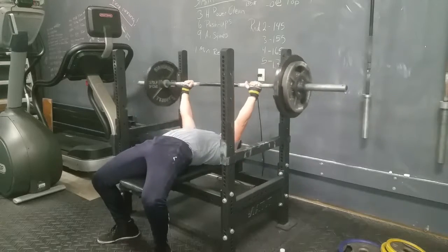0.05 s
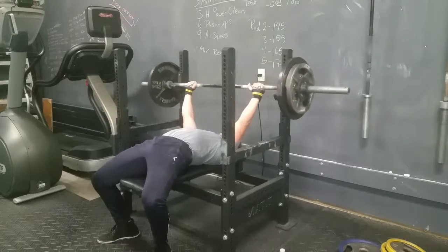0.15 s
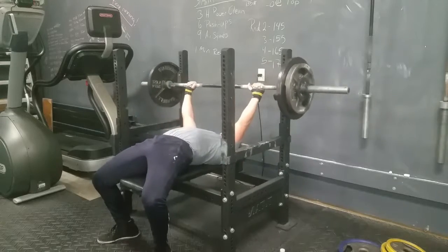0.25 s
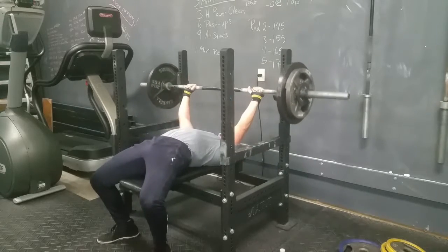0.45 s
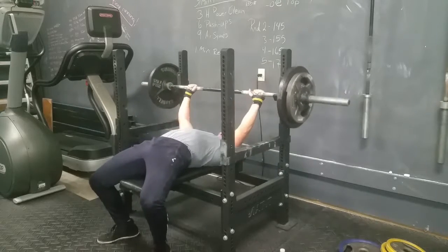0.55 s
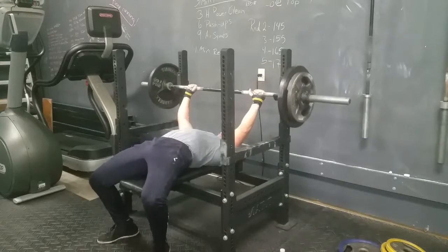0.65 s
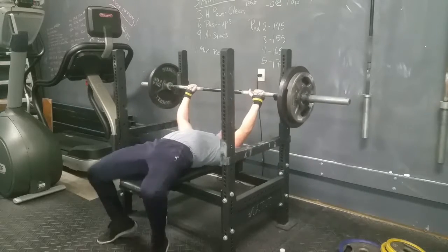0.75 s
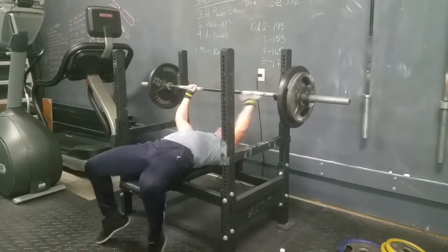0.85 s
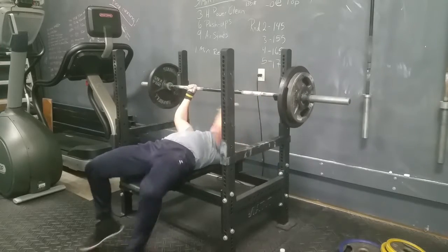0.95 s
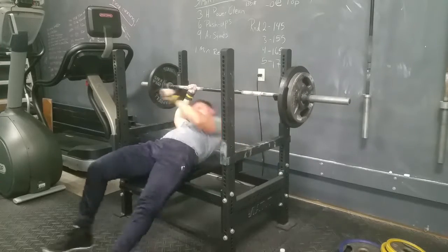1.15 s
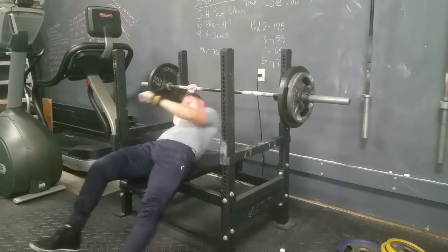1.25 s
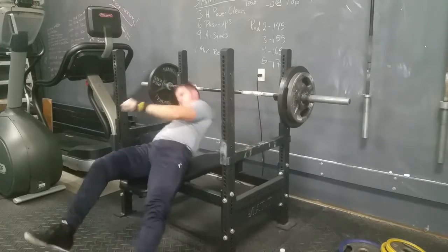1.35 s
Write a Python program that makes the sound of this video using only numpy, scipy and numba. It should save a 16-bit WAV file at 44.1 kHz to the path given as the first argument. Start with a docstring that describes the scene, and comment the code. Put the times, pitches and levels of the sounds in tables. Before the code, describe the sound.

A loaded barbell clangs into a steel rack at about 0.25 seconds, a few metres away. Quick clanks, thuds and short scrapes follow as its ends strike in turn, loudest around 0.4 and 0.7 seconds, with the iron plates ringing. From 0.9 seconds the knocks weaken, ending in a light clink near 1.3. The bar's ring lingers in the echoing gym over very faint ventilation and hum.

```python
"""A loaded barbell clatters into a steel rack, a few metres away in a hard-walled gym.
The bar hits the uprights, drops into the hooks and rocks to rest, its two ends striking in turn.
Each blow clangs the frame, rings the loose iron plates and the bar, thuds through the stand and
scrapes steel on steel. The room smears it into a long tail over ventilation and a low hum."""
import sys
import numpy as np
from scipy import signal
from scipy.fft import rfft, irfft, next_fast_len
from scipy.io import wavfile
from numba import njit

SR = 44100
rng = np.random.default_rng(int(sys.argv[2]) if len(sys.argv) > 2 else 0)


def transcribe(signal):
    """Save signal, clipped to [-1, 1], as a 16-bit WAV file at the path in sys.argv[1]."""
    frames = np.atleast_2d(signal).T
    limited = np.clip(frames, -1, 1)
    pcm = np.round(limited * 32767).astype(np.int16)
    wavfile.write(sys.argv[1], SR, pcm)


N = 61739
FFT_SIZE = 65536

# Hits of the bar, alternating ends: start_s, clang_db, plates_db, thud_db, scrape_db
BLOWS = [(0.2406, -1, -8, 3, -4.5), (.250, -0.5, 0.5, 2, -2), (.308, -6.5, -1.5, -1, -26),
         (.320, -3, -1.5, -2, -17), (.4205, 2, 6.5, -17, -1), (.431, -5, 8, -7.5, -6),
         (.465, -9.5, -11, -5, -11), (.515, -3, -4.5, -2, -16.5), (.552, -4, -17, -9.5, -27),
         (.581, -5.5, -10, -2, -10), (.601, -8, -23, -2.5, -2), (.620, -1, -9.5, -12.5, -8),
         (.638, -8, -13.5, -10.5, -14), (.667, 2, 1, 0, 4), (.674, -0.5, -9.5, 1, 5),
         (.690, -7, 1.5, -9, -3), (.728, -3, -1, -1.5, -2.5), (.752, -6.5, -18, -7, -2.5),
         (.797, -5.5, -16.5, -7.5, -15.5), (.846, -8, -18, -10, -12), (.928, -11.5, -1.5, -14, -25),
         (.975, -18.5, -12, -24, -30), (1.075, -23.5, -19.5, -18.5, -31.5), (1.262, -33, -11.5, -32, -37.5)]

def barbell():
    """The bar rocks to rest in the hooks, so its two ends strike in turn."""
    blows = np.array(BLOWS)
    return bar_end(blows[0::2]) + bar_end(blows[1::2])


def bar_end(blows):
    """One end hits its upright: five layers through the room, plus extra dry ring from the bar."""
    start_s, clang_db, plates_db, thud_db, scrape_db = blows.T
    clang = frame_clang(start_s, clang_db)
    plates = plate_ring(start_s, plates_db)
    bar = bar_ring(start_s, clang_db)
    thud = stand_thud(start_s, thud_db)
    scrape = steel_scrape(start_s, scrape_db)
    return gym(clang + plates + bar + thud + scrape) + undb(-0.5) * bar


# Tone of the frame's clang: freq_hz, level_db
FRAME_SPECTRUM = [(250, -11), (430, -14), (700, -5), (950, -0.5), (1450, -4.5), (1800, 0), (2450, -1),
                  (3100, -9.5), (3900, -9), (5000, -17), (5800, -35), (7000, -41)]

def frame_clang(start_s, hit_db, trim_db=6.5, count=400):
    """An upright's many short modes; every point of contact excites them differently."""
    edges_hz = np.linspace(FRAME_SPECTRUM[0][0], FRAME_SPECTRUM[-1][0], count + 1)
    pitch_hz = edges_hz[:-1] + np.diff(edges_hz) * rng.random(count)
    t60_s = 0.081 * np.exp(0.23 * rng.standard_normal(count))
    gains = unit(undb(lookup(FRAME_SPECTRUM, pitch_hz)))
    return strike_metal(pitch_hz, gains, t60_s, start_s, hit_db + trim_db)


# Partials of the iron plates: pitch_hz, level_db, t60_s
PLATE_MODES = [(1331, -7, 0.25), (1638.4, -3, .12), (1663, 0.5, 0.14), (1710, -4.5, 0.069),
               (1762, -13, .08), (2390, -13, 0.25), (3113, -12.5, 0.12), (3492, -12.5, 0.18),
               (3613, -13.5, 0.04)]

def plate_ring(start_s, hit_db, trim_db=-3):
    """The loose plates ring briefly in a few clear tones."""
    pitch_hz, level_db, t60_s = np.array(PLATE_MODES).T.copy()
    return strike_metal(pitch_hz, undb(level_db), t60_s, start_s, hit_db + trim_db)


# Partials of the steel bar: pitch_hz, level_db, t60_s
BAR_MODES = [(266.7, -10, .35), (728, -10.5, 0.25), (943.6, -0.5, 1.34), (1028, -7.5, 0.37),
             (1520, -3.5, 0.23), (1884, -5, 0.84), (1969, -8, .8), (2100, -7, 1.6), (2290, -7.5, 0.75),
             (2706, -15, .8), (2977, -6.5, 0.31)]

def bar_ring(start_s, hit_db, trim_db=-15.5):
    """The bar's long modes sing on after each hit."""
    pitch_hz, level_db, t60_s = np.array(BAR_MODES).T.copy()
    return strike_metal(pitch_hz, undb(level_db), t60_s, start_s, hit_db + trim_db)


def strike_metal(pitch_hz, gains, t60_s, start_s, hit_db, band_hz=(137, 5410)):
    """Each hit kicks the modes at random phases; the metal radiates little outside its band."""
    phases = np.exp(2j * np.pi * rng.random((len(start_s), len(pitch_hz))))
    pushes = phases * gains * undb(hit_db)[:, None]
    ringing = ring(pitch_hz, t60_s, (start_s * SR).astype(int), pushes)
    return signal.sosfilt(signal.butter(6, band_hz, "bandpass", fs=SR, output="sos"), ringing)


@njit
def ring(pitch_hz, t60_s, starts, pushes):
    """Damped modes; each blow gives each mode a push of its own."""
    loss = np.log(1000.) / t60_s / SR
    step = np.exp(2j * np.pi * pitch_hz / SR - loss)
    energy_scale = 2 * np.sqrt(loss)
    state = np.zeros(len(pitch_hz), np.complex128)
    out, blow = np.zeros(N), 0
    for i in range(starts[0], N):
        while blow < len(starts) and i >= starts[blow]:
            state += energy_scale * pushes[blow]
            blow += 1
        for mode in range(len(pitch_hz)):
            state[mode] *= step[mode]
            out[i] += state[mode].imag
    return out


# Low body of the thud: freq_hz, level_db
THUD_SPECTRUM = [(25, -28), (60, -25.5), (82, -11.5), (105, -6), (145, 1), (175, -1), (205, -5), (265, 2),
                 (350, -4.5), (500, -11), (900, -24.5), (4000, -83)]

def stand_thud(start_s, hit_db, trim_db=-6):
    """The weight lands with a dull thump through the stand."""
    return bursts(start_s, hit_db + trim_db, THUD_SPECTRUM, t60_s=0.064)


# Bright edge of the scrape: freq_hz, level_db
SCRAPE_SPECTRUM = [(2000, -1), (4500, 8), (6500, 2.5), (7800, -2.5), (10000, -3), (12000, -7), (15300, -17)]

def steel_scrape(start_s, hit_db, trim_db=-13):
    """Steel slides on steel with a short rasp."""
    return bursts(start_s, hit_db + trim_db, SCRAPE_SPECTRUM, t60_s=0.06)


def bursts(start_s, hit_db, spectrum, t60_s, size=8192):
    """A short dying burst of coloured noise at each blow."""
    out = np.zeros(N)
    noise = rng.standard_normal((len(start_s), size)) * fade(t60_s, size)
    shapes = unit(colour(noise, spectrum))
    for start, gain, burst in zip((start_s * SR).astype(int), undb(hit_db), shapes):
        out[start:start + size] += gain * burst[:N - start]
    return out


# Reverb time of the gym by band: freq_hz, t60_s
ROOM_DECAY = [(60, 0.85), (150, 0.96), (300, 1.36), (1000, 1.52), (2000, 1.71), (4000, 1.324), (6500, 1.2),
              (8500, 0.78), (13000, 0.62)]

def gym(x, direct_db=-13, early_db=-4, tail_db=-4.5, build_s=0.0098):
    """Direct sound, a splash off the near walls, and a long tail whose top end dies first."""
    hz = np.fft.rfftfreq(FFT_SIZE, 1 / SR)
    field = diffuse(hz)
    centres_hz, decays_s = np.array(ROOM_DECAY).T
    tail = np.zeros((2, N))
    for share, t60_s in zip(np.eye(len(centres_hz)), decays_s):
        band = lookup(np.c_[centres_hz, share], hz)
        tail += irfft(field * band)[:, :N] * fade(t60_s)
    tail *= 1 - np.exp(-np.arange(N) / SR / build_s)
    early = irfft(diffuse(hz))[:, :N] * fade(t60_s=0.14)
    response = undb(tail_db) * unit(tail) + undb(early_db) * unit(early)
    response[:, 0] += undb(direct_db)
    return signal.fftconvolve(x[None], response, axes=1)[:, :N]


def diffuse(hz, mic_gap_m=0.13):
    """Spectrum of noise from all sides at two mics: alike in the bass, unrelated in the treble."""
    coherence = np.sinc(2 * hz * mic_gap_m / 343)
    weights = np.sqrt(np.array([1 + coherence, 1 - coherence]) / 2)
    mid, side = rfft(rng.standard_normal((2, FFT_SIZE))) * weights
    return np.array([mid + side, mid - side])


# Rumble and hiss of the ventilation: freq_hz, level_db
AIR_SPECTRUM = [(25, -11), (60, -0.5), (120, -4), (170, -8.5), (400, -14), (800, -17.5), (1500, -23.5),
                (4000, -27.5), (7000, -40), (15000, -31)]

def room_tone(air_db=-60, hum_hz=115.1, hum_db=-58.5):
    """A soft bed of moving air with an electrical hum in the centre."""
    hz = np.fft.rfftfreq(FFT_SIZE, 1 / SR)
    air = irfft(diffuse(hz) * undb(lookup(AIR_SPECTRUM, hz)))[:, :N]
    hum = np.sqrt(2) * np.sin(2 * np.pi * hum_hz * np.arange(N) / SR)
    return undb(air_db) * np.sqrt(N) * unit(air) + undb(hum_db) * hum


def undb(db):
    """Decibels to gain."""
    return 10 ** (np.asarray(db) / 20)


def lookup(table, hz):
    """Read a table on a log-frequency axis."""
    table = np.array(table, float)
    return np.interp(np.log(np.maximum(hz, 1)), np.log(table[:, 0]), table[:, 1])


def colour(x, table):
    """Minimum-phase EQ from a table of freq_hz, level_db."""
    size = 2 * next_fast_len(x.shape[-1])
    gains = undb(lookup(table, np.fft.rfftfreq(size, 1 / SR)))
    cepstrum = irfft(np.log(gains))
    cepstrum[1:size // 2] *= 2
    cepstrum[size // 2 + 1:] = 0
    return irfft(rfft(x, size) * np.exp(rfft(cepstrum)))[..., :x.shape[-1]]


def fade(t60_s, size=N):
    """Exponential decay, 60 dB in t60_s."""
    return np.exp(-np.log(1000) * np.arange(size) / SR / t60_s)


def unit(x):
    """Scale to an energy of one."""
    return x / np.sqrt(np.sum(x ** 2, axis=-1, keepdims=True))


def scene():
    """The barbell up front, the room tone far beneath it."""
    return undb(10.5) * barbell() + room_tone()


# EQ of the left mic against the right: freq_hz, gain_db
LEFT_MIC_EQ = [(200, -1), (900, -0.5), (2400, -1.5), (4200, -1), (6500, 2), (8500, -15.5), (15000, -2.5)]

def record(dry, top_hz=15000):
    """The left mic is duller than the right; a steep low-pass cuts the top of both."""
    mics = np.array([colour(dry[0], LEFT_MIC_EQ), dry[1]])
    return signal.sosfilt(signal.ellip(8, .2, 70, top_hz, fs=SR, output="sos"), mics)


dry = scene()
out = record(dry)
transcribe(out)
```